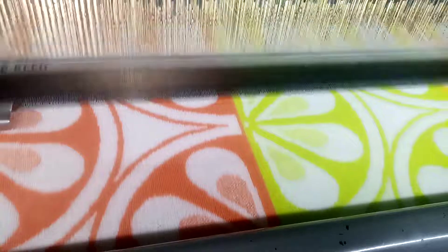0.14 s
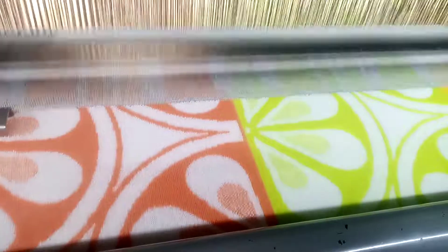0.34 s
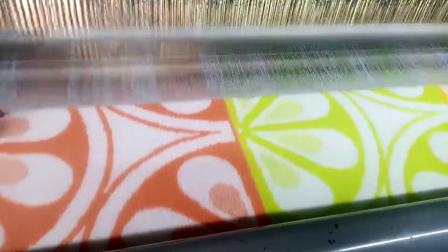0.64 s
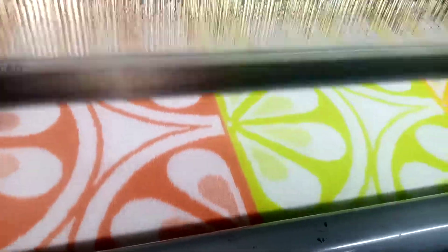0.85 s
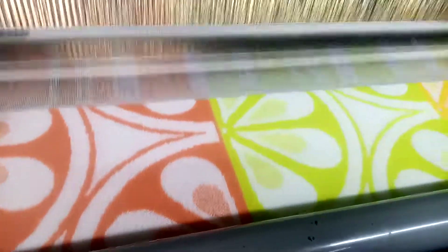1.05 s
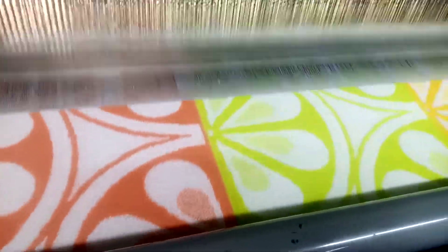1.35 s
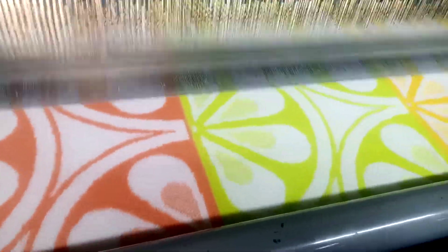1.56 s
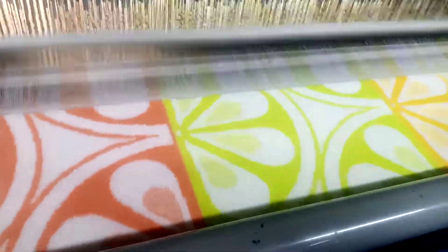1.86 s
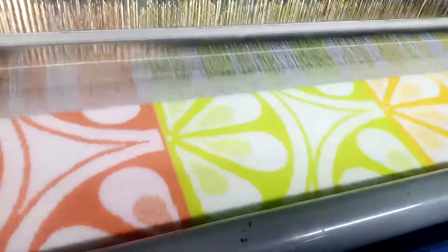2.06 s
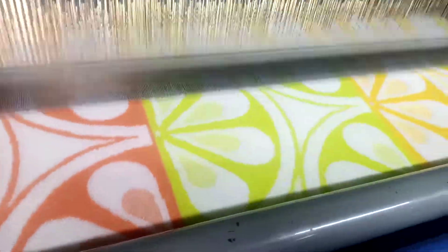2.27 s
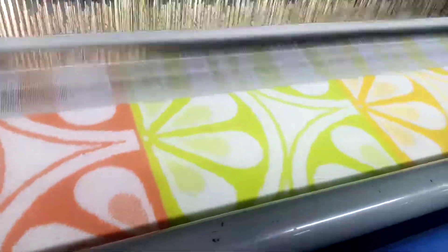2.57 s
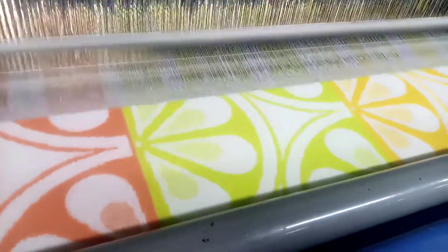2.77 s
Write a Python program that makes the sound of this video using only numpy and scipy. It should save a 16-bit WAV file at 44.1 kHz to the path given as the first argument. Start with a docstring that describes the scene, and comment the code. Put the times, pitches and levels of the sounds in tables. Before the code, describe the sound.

Close, dense and mono: a weaving machine repeats rapid reed knocks, snips, loose wire clatter, thuds and air puffs without pause, over humming drive and the broad roar of many other looms in the factory.

```python
"""Air-jet loom weaving

A loom at about 500 picks a minute, close to a phone microphone in a loud hall. In every pick gated hiss
blows the weft across; struck modes ring as the reed beats up, the cutter snips and the shed changes.
Clicks clatter, the frame thumps and the drive hums. The jets of a slightly slower loom nearby drift
against the beat, over the roar of the hall: fluttering filtered noise.
"""
import sys
import numpy as np
from scipy import signal
from scipy.fft import rfft, irfft
from scipy.io import wavfile

SR = 44100
rng = np.random.default_rng(int(sys.argv[2]) if len(sys.argv) > 2 else 0)


def generate_wav(sig):
    """Save sig (samples, or channels by samples) to the path in sys.argv[1] as 16-bit PCM at SR."""
    pcm = np.round(np.clip(np.atleast_2d(sig).T, -1, 1) * 32767).astype(np.int16)
    wavfile.write(sys.argv[1], SR, pcm)


N = 128331

PICK_S, NEIGHBOUR_PICK_S = 0.11972, 0.1247
TIMING_SLOP_S = 0.0005
BLOW_SPREAD_DB, GATE_SPREAD_DB = 2.4, 0.1


def amp(db):
    """Decibels to gain."""
    return 10 ** (np.asarray(db) / 20)


def evened(x):
    """Scales to rms 1."""
    return x / np.sqrt(np.mean(x ** 2) + 1e-20)


def coloured(x, points):
    """Filters x by a table of (freq_hz, gain_db), interpolated over log frequency."""
    freq_hz, gain_db = np.transpose(points)
    f = np.fft.rfftfreq(N, 1 / SR)
    gain = amp(np.interp(np.log(f + 1), np.log(freq_hz), gain_db))
    return irfft(rfft(x) * gain, N)


def white():
    """White noise of 0 dB per Hz."""
    return rng.standard_normal(N) * np.sqrt(SR / 2)


def picks(at_s, period_s, spread_db):
    """For each turn of a loom: the time since a part acted, and how hard."""
    t = np.arange(N) / SR
    turns = int(N / SR / period_s) + 1
    for k, (slop, force) in enumerate(rng.standard_normal((turns, 2))):
        start_s = k * period_s + at_s + TIMING_SLOP_S * slop
        yield np.maximum(t - start_s, 0), amp(spread_db * force)


def gate(at_s, hold_s, rise_s, fall_s, period_s):
    """Attack, hold and release, once in every pick."""
    level = np.zeros(N)
    for age_s, force in picks(at_s, period_s, GATE_SPREAD_DB):
        attack = np.minimum(age_s / rise_s, 1)
        release = np.exp(-np.clip((age_s - hold_s) / fall_s, 0, 20))
        level += force * attack * release
    return level


VALVE_RISE_S, VALVE_FALL_S = 0.0071, 0.012


def jet(open_s, hold_s, level_db, centre_hz, width_octaves, period_s):
    """A valve lets out a broad band of hiss in every pick."""
    f = np.fft.rfftfreq(N, 1 / SR)
    away = np.log2((f + 1) / centre_hz) / width_octaves
    hiss = irfft(rfft(white()) * np.exp(-(away / 2) ** 2), N)
    return amp(level_db) * hiss * gate(open_s, hold_s, VALVE_RISE_S, VALVE_FALL_S, period_s)


# air valves: open_s (in the pick), hold_s, level_db, centre_hz, width_octaves
WEFT_JETS = [(0.076, 0.029, -63, 5550, 0.7), (.086, 0.028, -60, 12950, 0.22),
             (.110, 0.04, -65.5, 7660, 0.71)]


def weft_jets():
    """Bursts of air blow the weft across."""
    return sum(jet(*row, PICK_S) for row in WEFT_JETS)


RATTLE_DB = -9  # against the strike
DETUNE = 0.024  # largest share by which a ring's pitch differs from blow to blow
RING_SWELL_S = 0.00063


def metal_blow(at_s, level_db, rattle_s, modes):
    """A firm strike with a brief rattle after it rings a metal part in every pick."""
    t = np.arange(SR // 10) / SR
    out = np.zeros(N + SR)
    for age_s, force in picks(at_s, PICK_S, BLOW_SPREAD_DB):
        rattle = rng.standard_normal(len(t)) * np.exp(-t / rattle_s)
        contact = (t == 0) + amp(RATTLE_DB) * rattle / np.linalg.norm(rattle)
        ring = np.zeros(len(t))
        for pitch_hz, mode_db, t60_s in modes:
            hz = pitch_hz * rng.uniform(1 - DETUNE, 1 + DETUNE)
            decay = np.exp(-np.log(1000) * t / t60_s)
            ring += amp(mode_db) * decay * np.sin(2 * np.pi * hz * t)
        ring *= 1 - np.exp(-t / RING_SWELL_S)
        start = np.searchsorted(age_s, 0, side="right")
        out[start:start + len(t)] += force * signal.fftconvolve(contact, ring)[:len(t)]
    return amp(level_db) * out[:N]


# blow of the reed: at_s (in the pick), level_db, rattle_s (decay)
REED_BLOW = (.0404, -21, 0.0037)
# modes of the reed: pitch_hz, level_db, t60_s
REED_MODES = [(1283, 3, 0.024), (1522, -2, 0.031), (1850, -8, 0.031)]


def reed_beat_up():
    """The reed rings as it beats up the weft."""
    return metal_blow(*REED_BLOW, REED_MODES)


# blow of the weft cutter: at_s (in the pick), level_db, rattle_s (decay)
CUTTER_BLOW = (.0433, -27.5, 0.0025)
# modes of the weft cutter: pitch_hz, level_db, t60_s
CUTTER_MODES = [(2310, 1, 0.027), (2450, -4, 0.026), (3690, 6, 0.018)]


def cutter_snip():
    """The cutter rings as it snips the weft."""
    return metal_blow(*CUTTER_BLOW, CUTTER_MODES)


# blow of the heald frames: at_s (in the pick), level_db, rattle_s (decay)
HEALD_BLOW = (.065, -31.5, 0.0026)
# modes of the heald frames: pitch_hz, level_db, t60_s
HEALD_MODES = [(775, 0, 0.11), (1760, 5, 0.021), (2310, -3, 0.059), (2620, -3, 0.059), (3560, 4.5, .03),
               (5120, 5, 0.029), (5900, 0, .025), (7460, 4, .025), (8600, 1, 0.049)]


def shed_change():
    """The heald frames ring as the shed changes."""
    return metal_blow(*HEALD_BLOW, HEALD_MODES)


CLATTER_AT_S, CLATTER_HOLD_S, CLATTER_RISE_S, CLATTER_FALL_S = 0.0481, 0.023, 0.0057, 0.018
CLICKS_PER_S = 3500  # mean, before gating
# spectrum of loose healds and wires: freq_hz, level_db (per Hz, before gating)
CLATTER_SPECTRUM = [(150, -71), (500, -62), (900, -61), (1400, -62), (2200, -66.5), (3500, -71),
                    (8000, -94), (16000, -97)]


def clatter():
    """Loose healds and wires: dense small clicks swell after the beat-up as the shed moves."""
    clicks = rng.standard_normal(N) * (rng.random(N) < CLICKS_PER_S / SR)
    clicks = evened(clicks) * np.sqrt(SR / 2)
    moving = gate(CLATTER_AT_S, CLATTER_HOLD_S, CLATTER_RISE_S, CLATTER_FALL_S, PICK_S)
    return coloured(clicks * moving, CLATTER_SPECTRUM)


THUMP_SWELL_S = 0.0034


def thump(at_s, level_db, pitch_hz):
    """The heavy frame shudders for a few cycles each time a moving part turns round."""
    t = np.arange(SR // 20) / SR
    pushes = np.zeros(N + 1)
    for age_s, force in picks(at_s, PICK_S, BLOW_SPREAD_DB):
        pushes[np.searchsorted(age_s, 0, side="right")] = force
    swell = (t / THUMP_SWELL_S * np.exp(1 - t / THUMP_SWELL_S)) ** 2
    shudder = swell * np.sin(2 * np.pi * pitch_hz * t)
    return amp(level_db) * signal.fftconvolve(pushes, shudder)[:N]


# thumps of the frame: at_s (in the pick), level_db, pitch_hz
FRAME_THUMPS = [(.0100, -42, 205), (.0230, -34.5, 111), (.0400, -27, 183), (0.048, -26.5, 112),
                (0.0554, -33, 335), (.0770, -28.5, 138), (0.088, -24, 263), (0.1158, -23, 267)]


def frame_thumps():
    """All the thumps of the frame in each pick."""
    return sum(thump(*row) for row in FRAME_THUMPS)


# hum of the drive: pick_rate_multiple, level_db (rms)
DRIVE_HUM = [(8, -49), (9, -74), (11, -45), (12, -46.5), (15, -43.5), (29, -40.5), (34, -48.5)]


def drive():
    """Shafts and cams hum on multiples of the pick rate."""
    turns = np.arange(N) / SR / PICK_S
    hum = np.zeros(N)
    for multiple, level_db in DRIVE_HUM:
        cycles = round(multiple) * turns + rng.random()
        hum += amp(level_db) * np.sqrt(2) * np.cos(2 * np.pi * cycles)
    return hum


# neighbour's air valves: open_s (in its pick), hold_s, level_db, centre_hz, width_octaves
NEIGHBOUR_VALVES = [(-.005, .032, -63, 15000, .16), (-.014, .088, -69.5, 7500, .6)]


def neighbour_jets():
    """Air bursts of a slower loom drift against the near one."""
    return sum(jet(*row, NEIGHBOUR_PICK_S) for row in NEIGHBOUR_VALVES)


HALL_FLUTTER_DB, HALL_FLUTTER_S = 0.5, 0.008  # rms depth; half length of the smoothing window
# roar of the hall: freq_hz, level_db (per Hz, before flutter)
HALL_SPECTRUM = [(20, -80), (32, -75), (60, -71.5), (100, -55.5), (170, -52), (250, -52), (370, -54.5),
                 (550, -59), (880, -57.5), (1400, -62.5), (1900, -62.5), (2900, -66), (5000, -65.5),
                 (9000, -70.5), (16000, -68)]


def hall():
    """Many far looms merge into a fluttering roar."""
    window = signal.windows.hann(int(2 * HALL_FLUTTER_S * SR) + 2)
    flutter = evened(signal.fftconvolve(rng.standard_normal(N), window, "same"))
    return coloured(white() * amp(HALL_FLUTTER_DB * flutter), HALL_SPECTRUM)


def scene():
    """The near loom, its neighbour and the hall: mono on two channels."""
    air = weft_jets() + neighbour_jets()
    metal = reed_beat_up() + cutter_snip() + shed_change() + clatter()
    frame = frame_thumps() + drive()
    return np.tile(air + metal + frame + hall(), (2, 1))


START_S, EDGE_HZ = 0.115, 15740  # silent before; low-pass edge
# microphone colour: freq_hz, gain_db
MIC_COLOUR = [(25, -12), (40, -2), (52, 0), (5200, 1), (6200, 5), (6600, 2.5), (7300, -4.5), (8300, -12.5),
              (9800, -13.5), (12000, -11.5), (13900, -5.5), (14750, 7), (15700, 6.5)]
# fade-in: time_s, gain_db
FADE_GAIN = [(.115, -22.5), (.145, -16.5), (.168, -10.5), (.22, -6.5), (.29, -6), (.34, -1.5), (.40, -0.5)]


def record(dry):
    """Microphone colour, a fade-in after silence, and the band limit."""
    t = np.arange(N) / SR
    fade = amp(np.interp(t, *np.transpose(FADE_GAIN))) * (t >= START_S)
    heard = coloured(dry, MIC_COLOUR) * fade
    low_pass = signal.firwin(1023, EDGE_HZ, window=("kaiser", 9), fs=SR)
    return signal.oaconvolve(heard, low_pass[None], "same", axes=1)


dry = scene()
out = record(dry)
generate_wav(out)
```